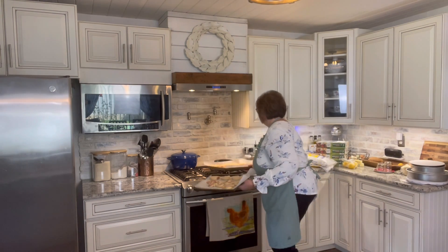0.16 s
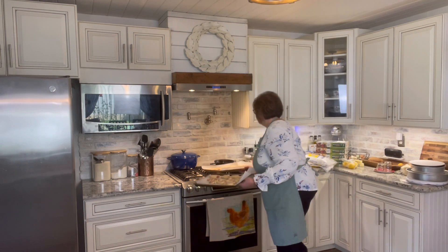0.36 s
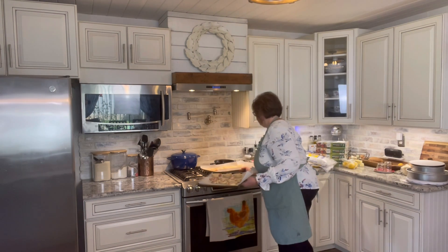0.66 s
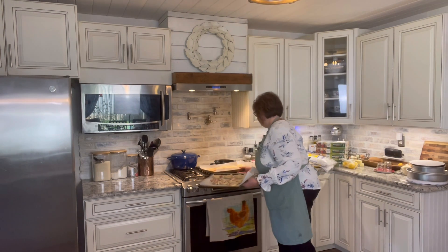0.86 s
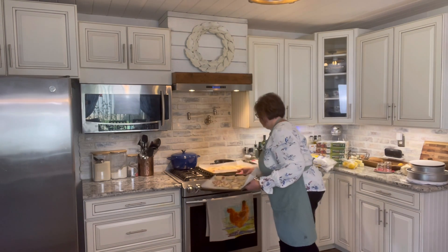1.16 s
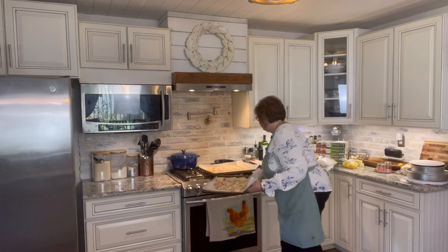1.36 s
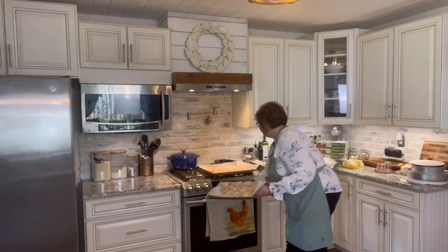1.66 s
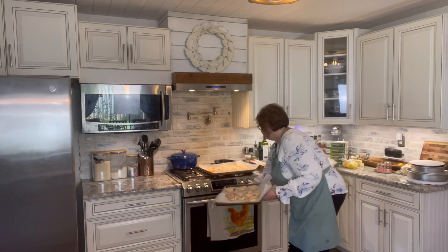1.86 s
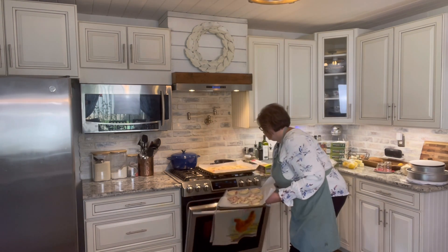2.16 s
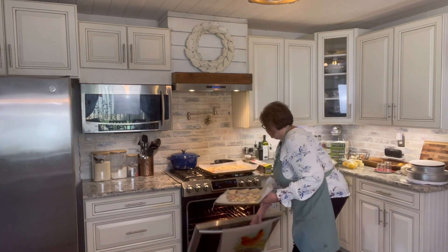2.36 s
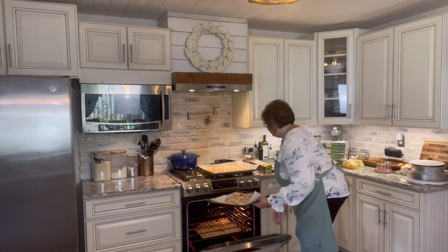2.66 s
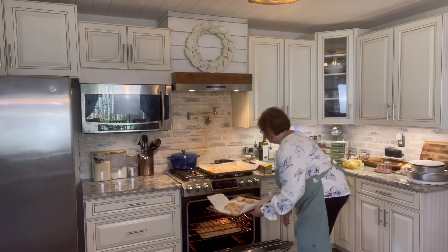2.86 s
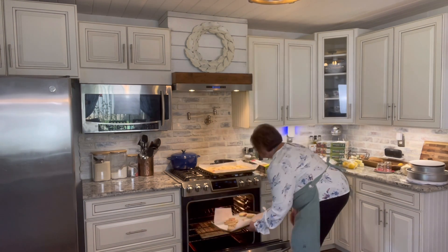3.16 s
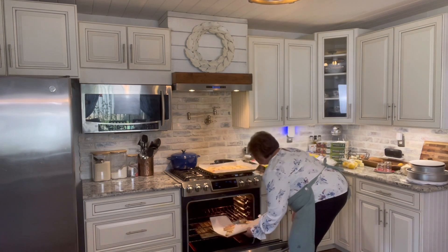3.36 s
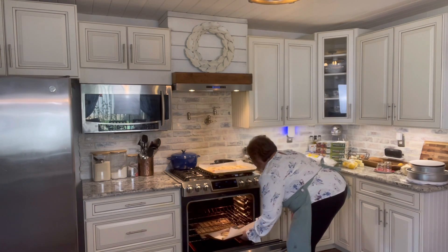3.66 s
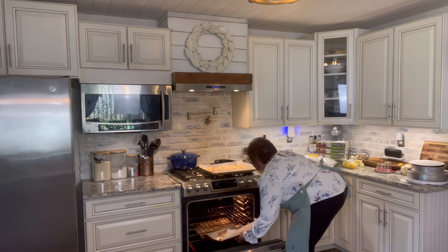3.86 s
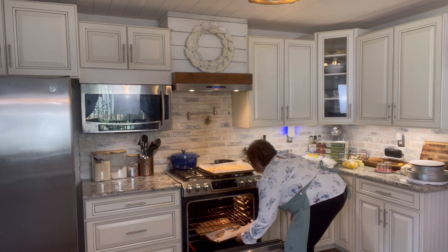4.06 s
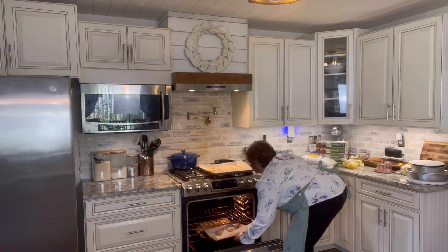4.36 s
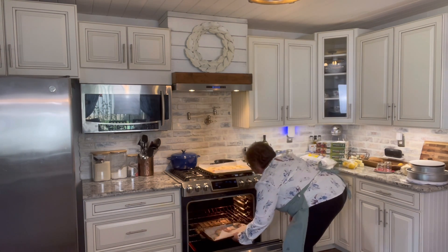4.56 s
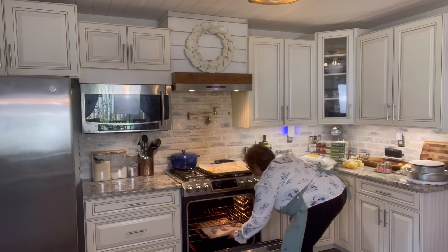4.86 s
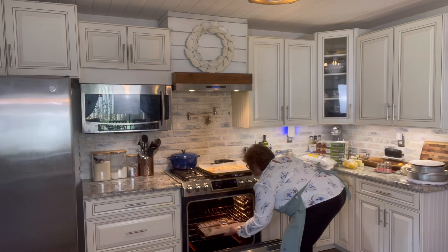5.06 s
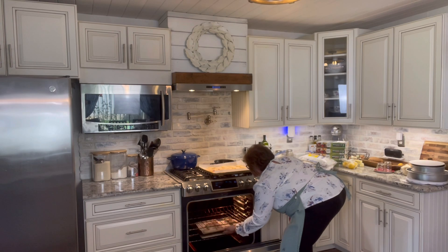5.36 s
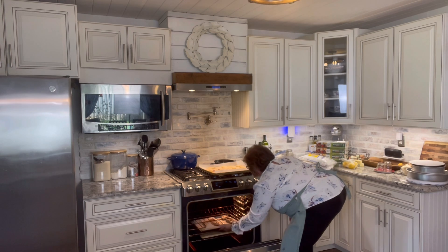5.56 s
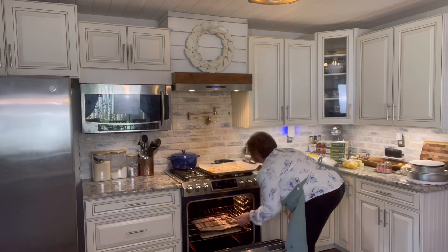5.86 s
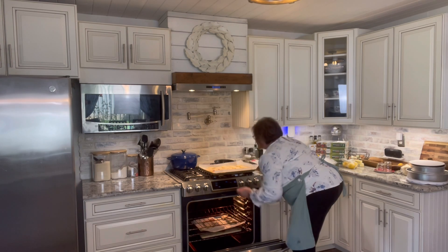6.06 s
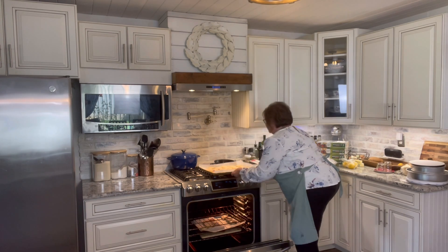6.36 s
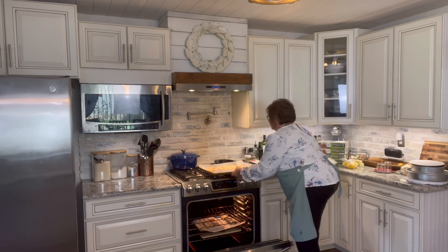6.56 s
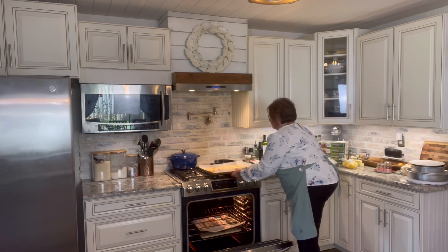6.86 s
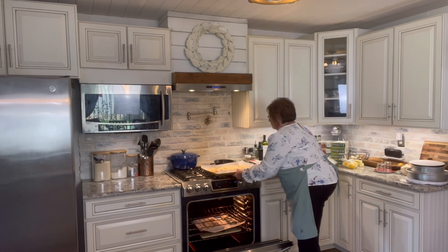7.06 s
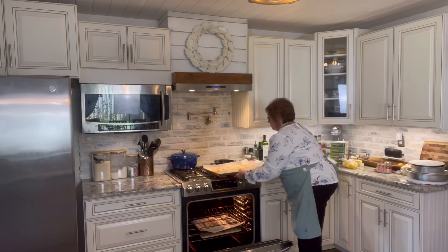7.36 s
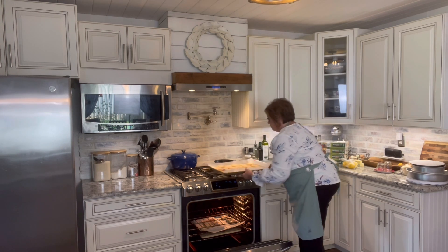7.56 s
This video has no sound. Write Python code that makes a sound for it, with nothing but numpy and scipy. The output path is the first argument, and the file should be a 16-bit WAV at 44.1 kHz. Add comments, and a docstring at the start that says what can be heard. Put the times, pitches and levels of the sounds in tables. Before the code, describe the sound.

Dry pan clatter on an iron grate, a soft oven door drop, then metallic rack bangs and scraping, a bright skid and dull final knocks.

```python
"""Pans, oven and baking paper in a kitchen

Heard from across the room: paper rustles, a sheet pan knocks and drags on the stove grate, the oven door
unlatches, the pan lands on the oven rack and scrapes in, a second pan is lifted off the grate.
Each contact is a force envelope on noise, filtered by the colour and modes of the body it excites;
free rack wires ring as decaying sines. Decaying noise tails give the reverberation, over a faint appliance hum."""
import sys
import numpy as np
from scipy import signal
from scipy.fft import rfft, irfft, next_fast_len
from scipy.io import wavfile
from scipy.ndimage import uniform_filter1d, map_coordinates

SR = 44100
rng = np.random.default_rng(int(sys.argv[2]) if len(sys.argv) > 2 else 0)


def pcm_store(signal):
    """Save signal as 16-bit PCM."""
    levels = np.round(np.clip(np.atleast_2d(signal), -1, 1) * 32767)
    wavfile.write(sys.argv[1], SR, levels.astype(np.int16).T)


N = 339570

# pan striking the oven rack: t/s, thud level/dB, hardness (clank over thud)/dB,
# rim tick over clank/dB, chatter t60/s
RACK_BLOWS = [(4.192, -44, 2.5, -27, .17), (4.5682, -27, 0.3, -25, .045), (4.5802, -26.5, -8.5, -16, .11),
              (4.734, -27, -4.5, -3, .14), (4.789, -37, 11, -6.5, .14), (4.8355, -39, 5.5, -17, .12),
              (5.0508, -33, -5, -2, .16), (5.1094, -36, -6, -15, .08), (5.1436, -39, -2.5, -18.5, .14),
              (5.3482, -35, -5.5, -2, .22), (5.5243, -42, 1.5, -9, .15), (5.556, -44, -3.5, -12, .15)]
# broad colour of scraped steel: f/Hz, relative level/dB
SCRAPED_STEEL = [(30, -29), (363, -3), (444, -9), (570, 1.5), (1720, -18), (3380, -11), (7000, -29.5),
                 (16000, -44)]


def amp(db):
    """Level and amplitude: decibels to linear gain."""
    return 10 ** (np.asarray(db) / 20)


def along(points, hz):
    """Logarithmic frequency scale: interpolate (f, value) points along it."""
    f, value = np.transpose(points)
    return np.interp(np.log(hz + 1), np.log(f + 1), value)


def filtered(x, response):
    """Linear filtering: the spectrum of x times a complex frequency response."""
    size = next_fast_len(N + SR)
    spectrum = rfft(x, size) * response(np.fft.rfftfreq(size, 1 / SR))
    return irfft(spectrum, size)[..., :N]


def causal(gain):
    """Minimum phase: fold the cepstrum of a gain so that its response starts at once."""
    cepstrum = irfft(np.log(gain + 1e-6))
    half = len(cepstrum) // 2
    cepstrum[1:half] *= 2
    cepstrum[half + 1:] = 0
    return np.exp(rfft(cepstrum))


def wobble(rate):
    """Slow random modulation: a smooth curve through rate random knots a second."""
    knots = rng.standard_normal(int(N * rate / SR) + 4)
    return map_coordinates(knots, [np.arange(N) * rate / SR])


def patchy(depth_db):
    """Shifting excitation: noise whose colour varies in patches, as each contact favours other modes."""
    z = signal.stft(rng.standard_normal(N + 512), nperseg=512)[2]
    field = uniform_filter1d(rng.standard_normal(z.shape), 4, 0)  # smooth in frequency
    field = uniform_filter1d(field, 6, 1)  # smooth in time
    noise = signal.istft(z * amp(depth_db * field / field.std()), nperseg=512)[1][:N]
    return noise / noise.std()


def sounded(force, spectrum, modes=(), ring_db=0., push=0.):
    """Source and filter: force envelopes drive noise, and a push as force rises, through a body."""
    split_hz, top_hz = 1500, 5000
    thud_hz, snap_hz = 1000, 2200  # edges when a snap register is present
    hz = np.fft.rfftfreq(2 ** 14, 1 / SR)

    def below(edge):
        return 1 / (1 + (hz / edge) ** 6)

    def between(low, high):
        return (1 - below(low)) * below(high)

    top = 1 - below(top_hz)
    if len(force) == 3:  # middle, low, high
        registers = [between(split_hz, top_hz), below(split_hz), top]
    else:  # clank, thud, snap, tick
        registers = [between(snap_hz, top_hz), below(thud_hz), between(thud_hz, snap_hz), top]
    ring = sum(amp(2 * (db + ring_db)) / (1 + (2 * (hz - centre) / width) ** 2) ** 2
               for centre, width, db in modes)
    gains = np.array(registers) * np.sqrt(amp(2 * along(spectrum, hz)) + ring)
    # each register has unit power, so the envelopes alone set its level
    body = [irfft(causal(gain / np.sqrt(np.mean(gain ** 2)))) for gain in gains]
    chatter = force * patchy(depth_db=2.5)
    sudden_rise = np.clip(np.diff(force, prepend=0), 0, None)
    drive = chatter - push * sudden_rise
    return signal.fftconvolve(drive, body, axes=1)[:, :N].sum(axis=0)


def bursts(starts, levels_db, t60s, rises, low_lasts=1.59, crack=0.):
    """Impulsive contact: quick rise and exponential decay, longer in the low register."""
    force = np.zeros((len(levels_db), N + SR))
    t = np.arange(SR // 2) / SR
    stretch = np.where(np.arange(len(force)) == 1, low_lasts, 1)[:, None]
    t60s, rises = t60s + 0 * starts, rises + 0 * starts  # one value per contact
    for start, db, t60, rise in zip(starts, np.transpose(levels_db), t60s, rises):
        decay = amp(-60 * t / (t60 * stretch))
        initial_crack = 1 + crack * amp(-60 * t / 0.0082)
        shape = (1 - np.exp(-t / rise)) * decay * initial_crack
        peak = shape.max(axis=1, keepdims=True)
        force[:, round(start * SR):][:, :len(t)] += amp(db)[:, None] * shape / peak
    return force[:, :N]


def drags(strokes, grit_db):
    """Stick-slip friction: sliding force catches on grit, judders slowly and bumps at random."""
    t, force = np.arange(N) / SR, np.zeros((3, N))
    for rows in strokes:
        s, *levels_db = np.transpose(rows)
        fade = np.clip(np.minimum(t - s[0], s[-1] - t) / 0.013, 0, 1)
        force += fade * amp([np.interp(t, s, db) for db in levels_db])
    slips = amp(grit_db * wobble(400) + 2.2 * wobble(35))
    bumps = (rng.random(N) < 60 / SR) * rng.uniform(0, 0.7, N)  # 60 a second on average
    bump_decay = amp(-60 * t[:SR // 10] / 0.05)
    slips = slips * (1 + signal.fftconvolve(bumps, bump_decay)[:N])
    return force * slips / np.sqrt(np.mean(slips ** 2))


def blows(rows, snap):
    """Impact hardness: a harder blow has more clank over its thud; the snap follows its own slope."""
    s, thud, hardness, tick, t60 = np.transpose(rows)
    snap_over_thud, growth = snap  # dB at hardness 0, dB per dB of hardness
    clank = thud + hardness
    return s, [clank, thud, thud + snap_over_thud + growth * hardness, clank + tick], t60


def fading(start, length, rumble_db, fall, hiss_db, sizzle_db):
    """Exponential loss of force: a stroke as rows of t/s and middle, low, high level/dB."""
    ends = ((0, rumble_db), (length, rumble_db - fall * length))
    return [(start + u, db + hiss_db, db, db + hiss_db + sizzle_db) for u, db in ends]


def hum():
    """Stationary broadband noise: appliances and air, wavering a little."""
    # colour of appliance and air noise: f/Hz, relative level/dB
    hum_colour = [(25, -22.5), (120, -9.5), (230, -6.5), (394, -4.5), (480, -7), (880, -5), (1250, -21.5),
                  (3000, -20), (4600, -33.5), (16000, -44.5)]
    # hum level before its small waver: t/s, level/dB
    hum_level = [(0.3, -65.5), (1.6, -70), (3.2, -70.5), (3.9, -69), (6.0, -70), (7.7, -68.5)]
    noise = filtered(rng.standard_normal(N), lambda hz: amp(along(hum_colour, hz)))
    level_db = np.interp(np.arange(N) / SR, *np.transpose(hum_level))
    return amp(level_db + 0.89 * wobble(12)) * noise / noise.std()


def paper():
    """Soft friction: brushes of baking paper and cloth; a longer brush swells more slowly."""
    # baking paper brushing: t/s, peak level/dB, crispness (high over middle)/dB, t60/s
    brushes = [(0.0435, -77.5, -2.5, 0.19), (0.815, -68, -32, 0.67), (0.86, -65, -25, 0.27),
               (1.8414, -73, -25, 0.23), (2.7344, -75.5, -20, .5), (2.8444, -56.5, -23, 0.21),
               (2.959, -63, -22, 0.43), (3.287, -68.5, -24, 0.41), (3.539, -69, -7, 0.28),
               (3.683, -71.5, -14, 0.19), (3.806, -63.5, -12, 0.23), (4.0214, -65.5, -12, 0.3),
               (4.367, -59, -12, 0.26), (5.8974, -79, 1, 0.21)]
    # broad colour of paper: f/Hz, relative level/dB
    paper_colour = [(59, -41), (100, -11), (570, -10.5), (721, -3.5), (3120, 0), (16000, -57.5)]
    # low resonances under each brush, likely the oven's hollow: f/Hz, width/Hz, level/dB
    hollow_modes = [(700, 56, 7.5), (930, 50, 4)]
    # the thin pan under the paper: f/Hz, width/Hz, level/dB
    sheet_modes = [(2700, 120, 3.5), (3300, 300, 0.5)]
    s, db, crisp, t60 = np.transpose(brushes)
    hand_db = -70.5 + 0 * s  # the dull brush of the hand under each
    force = bursts(s, [db, hand_db, db + crisp], t60, rises=0.021 * t60)
    return sounded(force, paper_colour, hollow_modes + sheet_modes)


def grate():
    """Damped impact: the cast grate dulls the pan to a dry clatter; softer blows swell more slowly."""
    # pan on the stove grate: t/s, thud level/dB, hardness (clank over thud)/dB,
    # rim tick over clank/dB, chatter t60/s
    grate_blows = [(0.425, -46, 10, -25.5, 0.062), (0.4323, -28, -6, -15.5, 0.072),
                   (0.5795, -35, -12, -49, 0.16), (0.6083, -27, -19.5, -42, .067),
                   (0.6489, -29, -6, -43, 0.039), (0.9839, -43, -23.5, -34, 0.063),
                   (1.0045, -42, -10, -49, 0.05), (1.1011, -32, -14.5, -50, 0.057),
                   (1.1715, -31.5, -7.5, -24.5, 0.093), (1.2452, -41, -7, -29, .06),
                   (1.956, -56, -29, -33, 0.21), (6.4322, -56, -33, 12, 0.086), (6.8871, -42, -28, -8, .12),
                   (6.9487, -44, -7, -6, 0.17), (6.987, -35.5, -18.5, -10, 0.097),
                   (7.0065, -41.5, -33, -3, 0.062), (7.083, -44, -12, -6, 0.043),
                   (7.0983, -38, -14, -10.5, .049), (7.139, -31, -24, -15, 0.084),
                   (7.1805, -33.5, -18, -2.5, 0.07), (7.2378, -34.5, -24.5, -26, .07)]
    # steel dragged over the grate: start t/s, length/s, rumble level/dB, fall/(dB per s),
    # hiss over rumble/dB
    grate_strokes = [(0.733, 0.26, -56.5, 37, -20), (1.18, 0.1716, -43.5, 16, -14),
                     (1.336, 0.14, -48, 150, -18.5), (1.817, .13, -64.5, 24.5, -14)]
    # broad colour of the pan on cast iron: f/Hz, relative level/dB
    iron_colour = [(40, -27.5), (180, -13), (400, 2), (1000, -2.5), (3000, -14.5), (4600, -33.5),
                   (7000, -36), (16000, -52)]
    # the pan's modes on the grate: f/Hz, width/Hz, level/dB
    pan_modes = [(1700, 120, -7), (2135, 200, -10)]
    hardness = np.transpose(grate_blows)[2]
    rises = 0.00025 * amp(-0.44 * hardness)  # s at hardness 0; 0.44 dB longer per dB softer
    force = bursts(*blows(grate_blows, snap=(2.5, 0.72)), rises, low_lasts=1.3, crack=0.6)
    knocks = sounded(force, iron_colour, pan_modes, push=4.5)
    strokes = [fading(*row, sizzle_db=-37) for row in grate_strokes]
    return knocks + sounded(drags(strokes, grit_db=1.5), iron_colour)


def door():
    """Released tension: the latch lets go, panel and springs rumble as the door starts down, it lands."""
    # the door unlatches, then lands softly: t/s, thud level/dB, hardness (clank over thud)/dB,
    # tick over clank/dB, chatter t60/s
    door_blows = [(2.172, -52, 11.5, -13, 0.22), (2.5184, -68.5, -13, -35, .2)]
    # the swing: start t/s, length/s, rumble level/dB, fall/(dB per s), hiss over rumble/dB
    swing = (2.185, 0.27, -48, 55, -9)
    # broad colour of the latch: f/Hz, relative level/dB
    latch_colour = [(59, -33), (100, -4), (818, -4.5), (1870, -9.5), (3320, -7), (7000, -27.5),
                    (11900, -28.5), (16000, -44)]
    # broad colour of the door's panel and springs: f/Hz, relative level/dB
    door_colour = [(30, -18.5), (227, -4), (512, -10.5), (2980, -27.5), (16000, -73)]
    rises = (0.00033, 0.018)  # s, unlatching and landing
    knocks = sounded(bursts(*blows(door_blows, snap=(5.7, -0.05)), rises), latch_colour)
    strokes = [fading(*swing, sizzle_db=-21)]
    return knocks + sounded(drags(strokes, grit_db=2.5), door_colour)


def cavity():
    """Cavity resonance: the open oven's hollow colours air noise into one band."""
    # band of the hollow: start t/s, f/Hz, width/Hz, level/dB
    hollow_band = (4, 782, 259.5, -75)
    start, centre_hz, width_hz, db = hollow_band
    noise = rng.standard_normal(N)
    band = filtered(noise, lambda hz: np.exp(-(2 * (hz - centre_hz) / width_hz) ** 2))
    fade_in = np.clip((np.arange(N) / SR - start) * 10, 0, 1)
    return amp(db) * fade_in * band / band.std()


def oven():
    """Modal excitation: rack and pan shake the oven's steel; a louder hiss is also brighter."""
    # the pan is pushed along the rack: t/s, rumble level/dB, hiss level/dB
    push_levels = [(4.6, -45, -59), (4.72, -44.5, -62), (4.9, -40, -52.5), (5.03, -45, -49.5),
                   (5.19, -40.5, -55), (5.24, -46, -67.5), (5.33, -53, -56), (5.45, -48, -48.5),
                   (5.6, -45.5, -52), (5.68, -55.5, -76.5), (5.76, -80, -86)]
    # the pan settles: start t/s, length/s, rumble level/dB, fall/(dB per s), hiss over rumble/dB
    settling = (4.22, 0.8, -51.5, 62, -7.5)
    # broad colour of struck steel: f/Hz, relative level/dB
    steel_colour = [(30, -38), (204, -11), (630, -4), (896, -4), (1020, -8), (2000, -14.5), (2840, -5.5),
                    (7170, -31.5), (16000, -44)]
    # the rack's modes: f/Hz, width/Hz, level/dB before ring_db is added
    rack_modes = [(660, 60, -1), (1030, 11, 1), (2720, 37, -0.5), (2880, 42, -9.5), (3082, 33, -8.5),
                  (7150, 400, -21.5)]
    force = bursts(*blows(RACK_BLOWS, snap=(0.5, 0.3)), 0.00014, crack=0.24)
    knocks = sounded(force, steel_colour, rack_modes, ring_db=-3.0, push=3.)
    # at this hiss level the high register lies this far over it, and grows 1.3 dB per dB
    at_db, over_db, growth = -52.5, -4, 1.3
    pushing = [(s, hiss, rumble, at_db + over_db + growth * (hiss - at_db))
               for s, rumble, hiss in push_levels]
    strokes = [fading(*settling, sizzle_db=-18.5), pushing]
    slides = sounded(drags(strokes, grit_db=1.5), SCRAPED_STEEL, rack_modes, ring_db=-10.5)
    return knocks + slides


def wires():
    """Free vibration: rack wires ring from the pan's first light touch until its weight mutes them."""
    # free rack wires: f/Hz, level/dB, t60/s
    wire_modes = [(291, -52.5, 0.98), (355, -58, 0.96), (1446, -54, .5)]
    t = np.arange(N) / SR
    since = np.clip(t - RACK_BLOWS[0][0], 0, None)
    free = np.clip((RACK_BLOWS[1][0] - t) * 100, 0, 1)
    return free * sum(amp(db - 60 * since / t60) * np.sin(2 * np.pi * hz * since)
                      for hz, db, t60 in wire_modes)


def skid():
    """Friction-driven modes: short bright skids excite the pan's rim."""
    # a pan rim skids: t/s, peak level/dB, high over middle/dB
    skid_table = [(6.5363, -54.5, -8), (6.6025, -51.5, -2.5)]
    # the rim's modes: f/Hz, width/Hz, level/dB before ring_db is added
    rim_modes = [(2250, 390, -2.5), (2858, 35, 8), (3500, 35, 7), (3725, 26, 8.5), (4060, 31, 2.5),
                 (7200, 1300, -12), (9950, 2400, -15)]
    s, db, high = np.transpose(skid_table)
    low_db = db - 16
    force = bursts(s, [db, low_db, db + high], t60s=0.24, rises=0.0136)
    return sounded(force, SCRAPED_STEEL, rim_modes, ring_db=-7.5)


def kitchen(x):
    """Diffuse reverberation: each short instant of sound decays through one of eight random noise tails."""
    # reverberation time of the room: f/Hz, t60/s
    room_decay = [(100, 0.91), (500, 0.44), (2500, 0.36), (7000, .3), (14000, 0.2)]
    knots = np.arange(0, N + 400, 400)
    pick, wet = rng.integers(8, size=len(knots)), np.zeros(N)
    delayed_by = (300, 0)  # samples of silence before the tail
    for k in range(8):
        hz, t, z = signal.stft(rng.standard_normal(3 * SR // 4), SR, nperseg=256)
        decay = amp(-60 * t / along(room_decay, hz)[:, None])
        tail = signal.istft(z * decay, SR, nperseg=256)[1]
        # neighbouring instants crossfade from tail to tail
        share = np.sqrt(np.interp(np.arange(N), knots, pick == k))
        wet += signal.fftconvolve(np.pad(x * share, delayed_by), tail / np.linalg.norm(tail))[:N]
    return wet


def scene():
    """Superposition: direct sound, reverberation and background noise add."""
    near = paper() + grate() + door() + oven() + wires() + skid()
    return (near + amp(-7.5) * kitchen(near) + hum() + cavity())[None]


def record(dry):
    """Band limiting: the microphone drops deep bass and dulls the top, with nothing above a limit."""
    bass_hz, treble_hz, limit_hz = 64, 13100, 15800

    def microphone(hz):
        bass_cut = (1j * hz / (bass_hz + 1j * hz)) ** 2
        return bass_cut / np.sqrt(1 + (hz / treble_hz) ** 8)

    return filtered(dry, lambda hz: microphone(hz) * (hz < limit_hz))


dry = scene()
out = record(dry)
pcm_store(out)
```